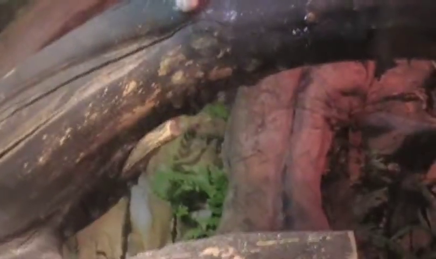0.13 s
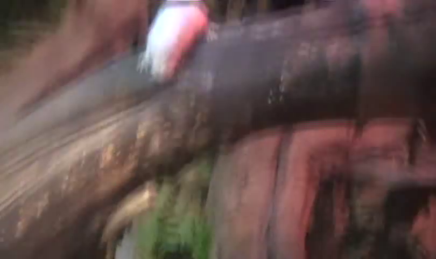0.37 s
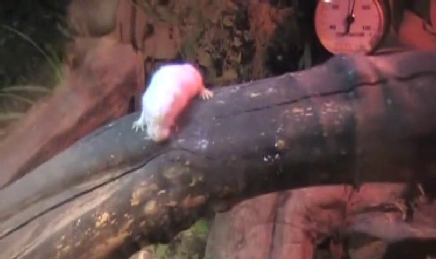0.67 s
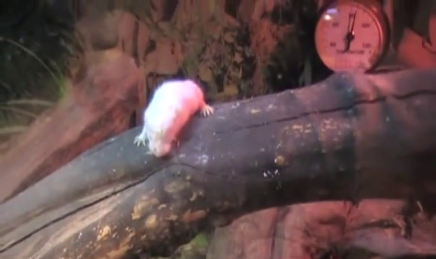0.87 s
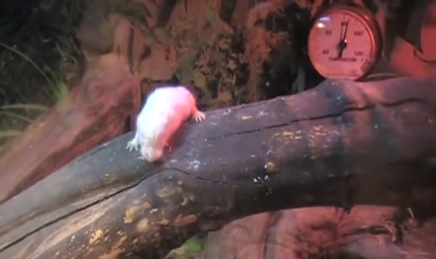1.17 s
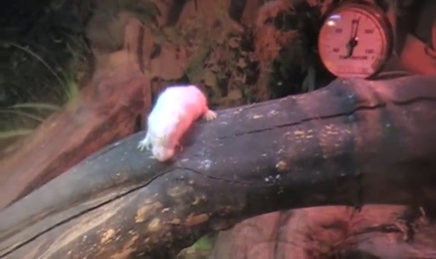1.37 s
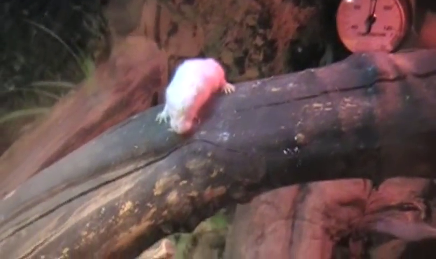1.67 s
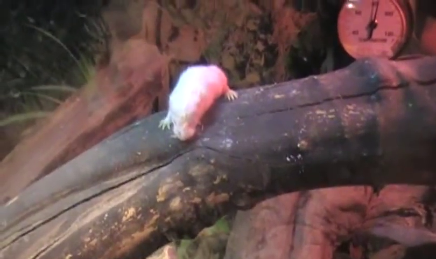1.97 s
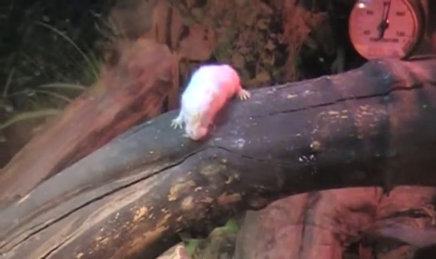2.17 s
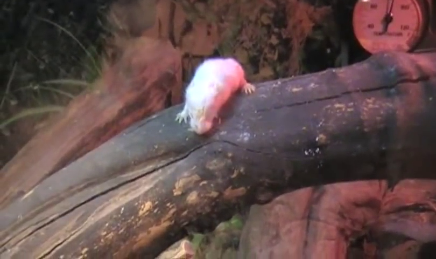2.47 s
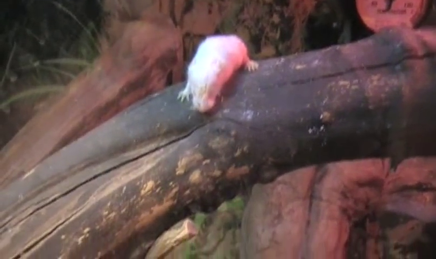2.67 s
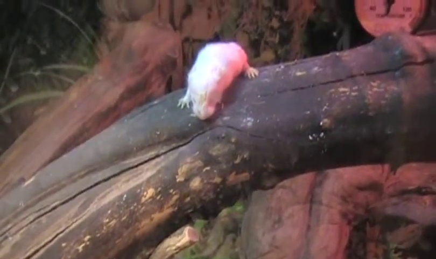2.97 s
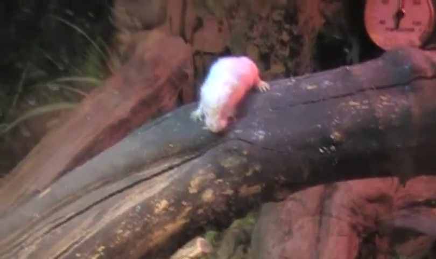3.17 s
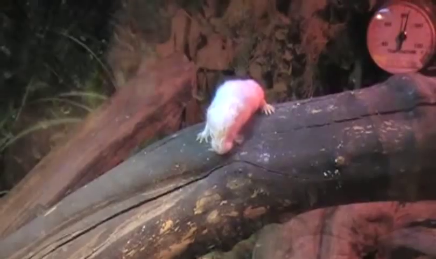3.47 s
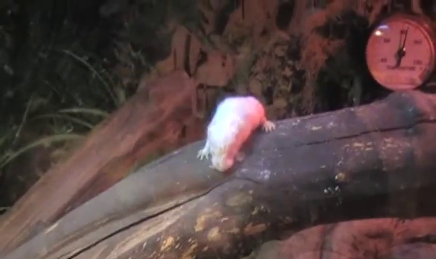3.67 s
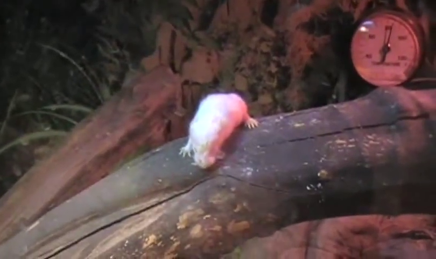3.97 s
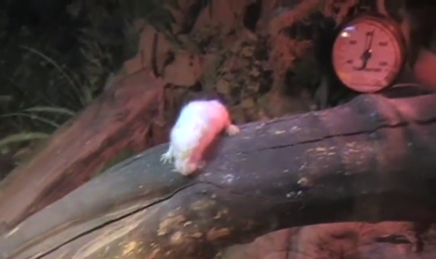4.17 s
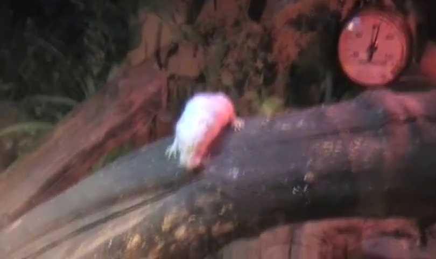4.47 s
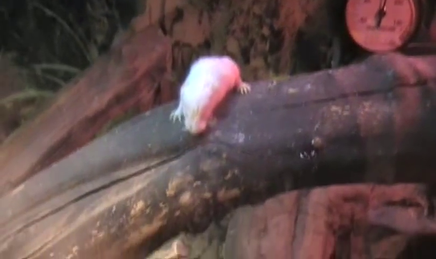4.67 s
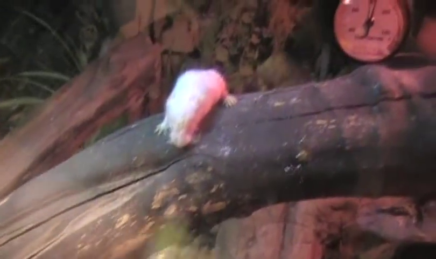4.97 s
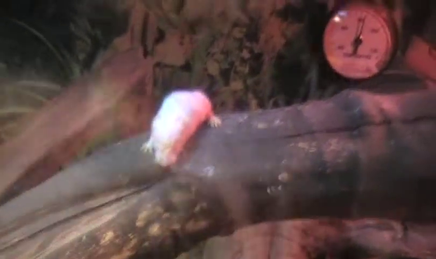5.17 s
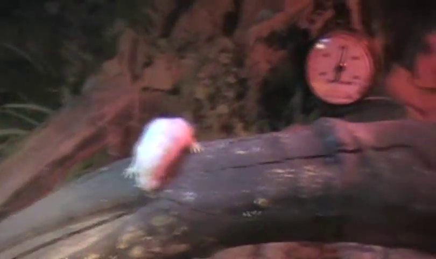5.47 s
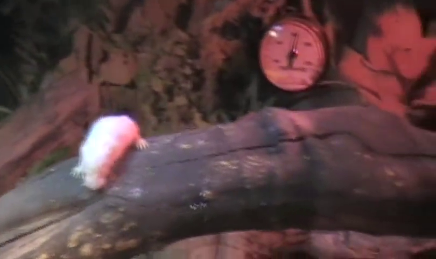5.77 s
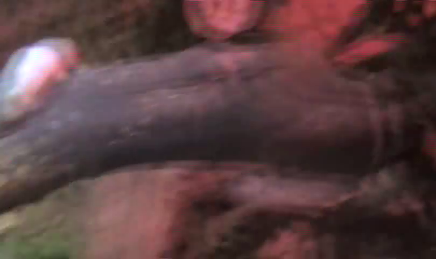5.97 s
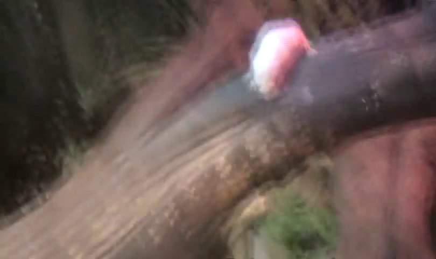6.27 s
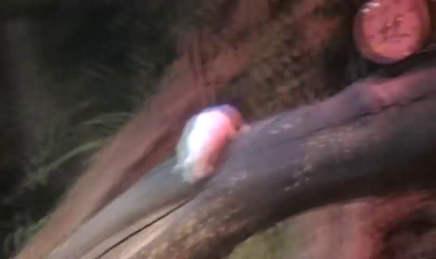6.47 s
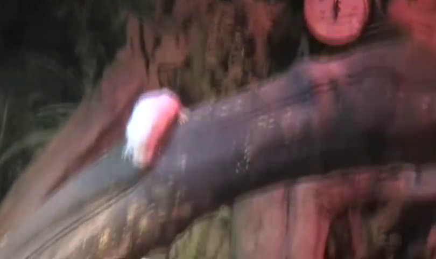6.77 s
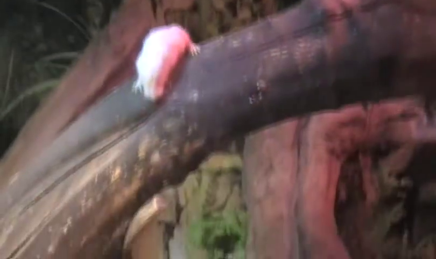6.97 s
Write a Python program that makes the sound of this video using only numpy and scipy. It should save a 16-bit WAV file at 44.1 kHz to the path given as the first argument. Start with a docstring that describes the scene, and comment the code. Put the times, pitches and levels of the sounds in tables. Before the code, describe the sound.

Quiet room noise and a low electrical hum run throughout. A baby rodent in a glass terrarium gives one tiny, high squeak at the very start, then quick groups of two or three at about 1.5, 2.4, 3.6, 4.4, 5.4 and 6.7 seconds. Each group grows louder, and the squeaks are thin, slightly breathy and ring briefly in the tank. Close to the microphone, light ticks appear from about 1.2 seconds, with a soft bump and scrape at 3.1 and more ticking afterwards. A hollow thump at 4.7 leads into a fast clatter of hard knocks around 5 seconds, by far the loudest sound. A sharp click follows at 5.4, then smaller taps and scrapes until about 6.2. Soft hand rustle is heard at the opening and again from 4 seconds to the end, just after 7.

```python
"""In a glass terrarium, a baby rodent on a log gives short rising groups of squeaks.
Each is a gliding whistle with a puff of air, prolonged by the tank's resonances and echoes.
Close to the microphone something hard is knocked, ticked and scraped: impact excites its modes,
friction gives noise. Below lie room noise, mains hum, a faint whistle and the rustle of a hand."""
import sys
import numpy as np
from scipy import signal
from scipy.io import wavfile

SR = 44100
rng = np.random.default_rng(int(sys.argv[2]) if len(sys.argv) > 2 else 0)


def inscribe(sig):
    """Save sig as 16-bit PCM at rate SR to the path in sys.argv[1].

    A 1-D sig is mono; a 2-D sig holds one channel per row.
    Samples are clipped to [-1, 1] before scaling.
    """
    pcm = np.round(np.clip(np.atleast_2d(sig).T, -1, 1) * 32767)
    wavfile.write(sys.argv[1], SR, pcm.astype(np.int16))


N = 313985


def from_db(db):
    """Decibels to amplitude ratio."""
    return 10 ** (np.asarray(db) / 20)


def rms_one(x):
    """Normalisation to unit rms."""
    return x / np.sqrt(np.mean(x ** 2) + 1e-20)


def at_hz(points, hz):
    """Interpolation of a table on a log-frequency axis."""
    freqs, values = np.transpose(points)
    return np.interp(np.log(hz), np.log(freqs), values)


def band(x, low_hz, high_hz, order=2):
    """Butterworth band-pass filtering."""
    return signal.sosfilt(signal.butter(order, [low_hz, high_hz], "band", fs=SR, output="sos"), x)


def drift(rate_hz, count):
    """Random fluctuation: noise through two one-pole low-passes, at unit rms."""
    r = np.exp(-2 * np.pi * rate_hz / SR)
    return rms_one(signal.lfilter([1], [1, -2 * r, r * r], rng.standard_normal(count + SR))[SR:])


def add(out, sound, start_s, pan_db):
    """Superposition on the stereo track; pan_db is the level left minus right."""
    i = round(start_s * SR)
    out[:, i:i + sound.shape[-1]] += (sound * from_db([[pan_db / 2], [-pan_db / 2]]))[:, :N - i]


def wide_noise(count, width):
    """Mid-side noise: one part in phase at the two ears, one in antiphase."""
    mid, side = rng.standard_normal((2, count))
    return mid + width * side * [[1], [-1]]


def correlated(mid, side, correlation):
    """Partial coherence: two independent noises mix to a given left-right correlation."""
    return np.sqrt(1 + correlation) * mid + np.sqrt(1 - correlation) * side * [[1], [-1]]


# likeness of the noise at the two ears: frequency_hz, correlation
EAR_CORRELATION = [(60, -0.17), (130, 0.67), (290, -0.39), (640, -0.46), (1410, -0.54), (3100, -0.22),
                   (6820, 0.17), (15000, -0.37)]
def banded_noise(spectrum, flicker_db=0.5):
    """Spectral shaping: half-octave bands of stereo noise flicker separately; the sum has unit rms."""
    out, edges = 0, np.geomspace(20, 17000, 21)
    white, flicker = rng.standard_normal((2, 2, N)), drift(9, 2 * N)
    for k, (low, high) in enumerate(zip(edges, edges[1:])):
        mid, side = band(white[k % 2], low, high)
        centre_hz = np.sqrt(low * high)
        gain = from_db(at_hz(spectrum, centre_hz) + flicker_db * flicker[k * N // 20:][:N])
        out = out + gain * correlated(mid, side, at_hz(EAR_CORRELATION, centre_hz))
    return rms_one(out)


# spectrum of the room's air: frequency_hz, relative_density_db
AIR_SPECTRUM = [(25, -53), (40, -12.5), (60, -8.5), (90, -13.5), (160, -8.5), (250, -9.5), (500, -15.5),
                (650, -15), (1240, -22), (2130, -26.5), (5000, -36), (12500, -42.5), (14500, -40.5),
                (16000, -54)]
def room_noise(level_db=-45.5):
    """Ambient noise: the air of the room gives a steady broadband floor."""
    return from_db(level_db) * banded_noise(AIR_SPECTRUM) * from_db([[-.5], [.5]])


# mains and motor tones, and a high whine: pitch_hz, level_db, waver_db
HUM_TONES = [(119.6, -51, 1.5), (1065, -78, 7.5), (2162, -73.5, 0.5)]
HIGH_WHINE = [(12600, -78, 1.5)]
def hum():
    """Amplitude modulation: mains hum and thin motor tones waver in level at constant pitch."""
    t, tones = np.arange(N) / SR, 0
    for hz, db, waver_db in HUM_TONES + HIGH_WHINE:
        amplitude = np.sqrt(2) * from_db(db + waver_db * drift(22, N))
        tones += amplitude * np.sin(2 * np.pi * (hz * t + rng.random()))
    return tones * from_db([[-1.8], [1.8]])


# course of a faint whistle: time_s, pitch_hz, level_db
WHISTLE_PATH = [(.08, 9600, -95), (.13, 9650, -74), (.2, 9850, -77), (.27, 10050, -79), (.33, 9850, -75),
                (.39, 9950, -79), (.45, 10400, -84), (.52, 9650, -75), (.58, 9600, -95)]
def whistle(flicker_db=3):
    """Frequency and amplitude modulation: a thin tone wanders and flickers."""
    times, hz, db = np.transpose(WHISTLE_PATH)
    t = np.arange(N) / SR
    level = from_db(np.interp(t, times, db, left=-200, right=-200) + flicker_db * drift(30, N))
    return np.sqrt(2) * level * np.sin(2 * np.pi * np.cumsum(np.interp(t, times, hz)) / SR)


# movement of the hand that holds the microphone: time_s, rub_db, hiss_db
HAND_MOTION = [(0, -52, -80), (.45, -51.5, -84), (.9, -65, -84), (2.9, -68, -84), (3.4, -65, -75),
               (3.9, -52.5, -73), (4.16, -49.5, -71), (4.36, -45.5, -59.5), (4.55, -53, -68),
               (5.3, -50.5, -68), (5.75, -52.5, -66), (6.2, -52, -70), (6.5, -45.5, -60.5),
               (6.65, -47.5, -63.5), (6.9, -49, -63.5), (7.12, -48, -61)]
# spectrum of the rubbing: frequency_hz, relative_density_db
RUB_SPECTRUM = [(150, -24), (280, -14.5), (500, 2), (800, -4), (1300, -7), (2150, -15), (3300, -17),
                (4300, -19), (6000, -20), (8300, -26.5), (11000, -29), (15000, -42)]
# bands of hiss: centre_hz, width_hz, gain_db
HISS_BANDS = [(2170, 360, 1), (4350, 400, -6), (6200, 480, -7), (8400, 500, 0), (9500, 3300, -1)]
def rustle():
    """Friction noise: skin and cloth rub as the hand moves, and a few bands of hiss stand out."""
    times, rub_db, hiss_db = np.transpose(HAND_MOTION)
    t, noise = np.arange(N) / SR, wide_noise(N, width=0.5)
    hiss = sum(from_db(db) * rms_one(band(noise, hz - width / 2, hz + width / 2, order=1))
               for hz, width, db in HISS_BANDS)
    rub = banded_noise([(14, -60)] + RUB_SPECTRUM)
    return from_db(np.interp(t, times, rub_db)) * rub + from_db(np.interp(t, times, hiss_db)) * hiss


# reverberation time of the room: frequency_hz, t60_s
ROOM_DECAY = [(200, 0.29), (2000, 0.35), (5500, 0.24), (8500, 0.19), (13000, 0.038)]
def room(x, onset_s=0.002):
    """Reverberation: dense reflections act as a noise tail, each octave decaying at its own rate."""
    t, edges = np.arange(SR // 2) / SR, 80 * 2 ** np.arange(9)
    noise = correlated(*rng.standard_normal((2, len(t))), correlation=0.73)
    tail = sum(band(noise, low, high) * from_db(-60 * t / at_hz(ROOM_DECAY, np.sqrt(low * high)))
               for low, high in zip(edges, edges[1:]))
    tail *= np.clip(t / onset_s, 0, 1) ** 2
    response = rms_one(tail) / np.sqrt(len(t))
    return signal.fftconvolve(x.mean(axis=0, keepdims=True), response, axes=1)[:, :N]


# scraping strokes: start_s, length_s, level_db, tilt_db_per_octave
STROKES = [(3.132, 0.12, -45, 0), (3.889, .066, -62.5, 4), (4.852, .085, -47, 1.5),
           (4.914, 0.032, -41.5, -2.5), (5.204, 0.081, -56.5, 5.5), (5.663, 0.056, -52.5, -2),
           (6.137, 0.12, -55.5, 2)]
# response of the rubbed surface: low_hz, high_hz, gain_db
SURFACE_BANDS = [(187, 326, 4), (740, 1000, 2.5), (1890, 2550, -1), (2730, 4750, -3.5), (5500, 10400, -4.5)]
def scrapes(grain_db=2.0):
    """Sliding friction: uneven grains excite the surface; a lighter stroke tilts the spectrum upward."""
    out, count = np.zeros((2, N)), SR // 4
    for start, length, db, tilt in STROKES:
        grains = wide_noise(count, width=0.35) * from_db(grain_db * drift(170, count))
        rub = sum(from_db(gain_db + tilt * np.log2(low / 1000)) * rms_one(band(grains, low, high))
                  for low, high, gain_db in SURFACE_BANDS)
        progress = np.arange(round(length * SR)) / (length * SR)
        swell = np.sin(np.pi * progress ** 0.69)
        add(out, from_db(db) * rub[:, :len(swell)] * swell, start, pan_db=-1.5)
    return out


# light contacts: start_s, level_db, low_hz, high_hz, pan_db
LIGHT_CONTACTS = [(1.165, -41.5, 2300, 3300, 3), (1.399, -38, 1500, 8400, 0), (2.209, -36, 1600, 5940, 6),
                  (2.301, -41, 2000, 3800, 7), (3.271, -45, 1500, 6500, 3), (3.351, -39, 2500, 10000, -1),
                  (3.365, -39.5, 1790, 3600, 1), (3.377, -41.5, 1800, 3600, 3),
                  (3.409, -42, 2500, 13000, 0), (3.465, -41.5, 2220, 3970, 6), (3.899, -41, 5000, 12100, 1),
                  (4.039, -43, 6000, 15000, 10), (4.258, -46, 6960, 9500, 0), (4.432, -37, 6980, 12750, 9),
                  (4.511, -36, 1980, 9500, 0), (4.534, -42, 7460, 10970, -4),
                  (4.690, -43.5, 6000, 10900, 0), (4.741, -42.5, 2000, 9000, -2),
                  (4.786, -49, 4000, 9770, -20), (4.806, -35, 3500, 10900, -2),
                  (5.413, -18.5, 700, 5000, 0), (5.268, -24, 900, 9500, 8), (5.881, -42, 3000, 11000, 0),
                  (5.969, -27, 1950, 13700, 5), (5.990, -28, 7040, 13900, 7), (6.197, -40, 1480, 3000, -2)]
def ticks(t60_s=0.015):
    """Impact transients: an impulse and a fast-decaying noise, limited to the band of the contact."""
    out, t = np.zeros((2, N)), np.arange(SR // 10) / SR
    for start, db, low, high, pan_db in LIGHT_CONTACTS:
        excitation = rng.standard_normal(len(t)) + 0.8 * (t == 0)
        tick = band(excitation * from_db(-60 * t / t60_s), low, high)
        add(out, from_db(db) * tick / np.abs(tick).max(), start, pan_db)
    return out


def blows(events, modes, noise_db, loss_db, damping, pan_db, attack_s, width, noise_t60_s=0.069):
    """Modal ringing: ever weaker touches each excite all modes and a noise; the hand damps both."""
    out, t = np.zeros((2, N)), np.arange(SR // 4) / SR
    hz, mode_db, t60 = np.transpose(modes)[:, :, None]
    damped_t = t / (1 - damping)
    for start, db, low, high, touches, gap in events:
        for k in range(touches):
            strength = from_db(mode_db + 2.8 * rng.standard_normal(hz.shape))
            strength *= rng.choice([-1, 1], hz.shape)
            rings = np.sum(strength * from_db(-60 * damped_t / t60) * np.sin(2 * np.pi * hz * t), axis=0)
            noise = from_db(noise_db - 60 * damped_t / noise_t60_s) * wide_noise(len(t), width)
            blow = band((rings + noise) * np.clip(t / attack_s, 0, 1), low, high)
            add(out, from_db(db - loss_db * k) * blow / np.abs(blow).max(), start + gap * k, pan_db)
    return out


# dull blows: start_s, level_db, low_hz, high_hz, touch_count, gap_s
DULL_BLOWS = [(3.104, -24.5, 503, 2480, 1, .004), (3.108, -28.5, 148, 400, 1, .01),
              (3.128, -40, 150, 300, 1, .01), (4.742, -10, 198, 1600, 5, .008),
              (5.416, -24, 110, 560, 4, .0145), (5.49, -37.5, 100, 300, 3, .02),
              (5.309, -36.5, 655, 1040, 1, .01), (5.660, -25, 1010, 1730, 1, .01)]
# modes of the hollow housing: frequency_hz, gain_db, t60_s
HOUSING_MODES = [(196, 2, 0.07), (213, 2, 0.19), (295, 3.5, 0.11), (356, 8, 0.032), (437, 5.5, 0.04),
                 (715, -9, 0.17), (806, 1, 0.05), (1100, -2, 0.049), (1360, -11, 0.12), (1423, -6.5, 0.14),
                 (1755, -10, 0.046)]
def thumps():
    """Soft impact: a slower, low-band contact excites the modes of the hollow housing."""
    return blows(DULL_BLOWS, HOUSING_MODES, noise_db=-2, loss_db=1, damping=0.5,
                 pan_db=-3.5, attack_s=0.0013, width=0.33)


# hard blows: start_s, level_db, low_hz, high_hz, touch_count, gap_s
HARD_BLOWS = [(4.944, 4, 300, 4730, 3, .0065), (4.970, -2, 150, 5500, 2, .0055),
              (4.985, -2, 149, 5500, 3, .006), (5.021, -17, 146, 3970, 1, 0.013),
              (5.310, -20, 5950, 11600, 1, .01), (5.413, -8, 5500, 11700, 2, .003),
              (5.436, -23, 2980, 12000, 1, .01), (5.661, -27.5, 1100, 7400, 1, .01)]
# modes of the knocked object: frequency_hz, gain_db, t60_s
OBJECT_MODES = [(228.7, 9.5, 0.29), (300, -10, 0.15), (347, 6.5, 0.26), (400, 10, 0.07), (536, 0, 0.37),
                (816, 2.5, 0.091), (993, 2.5, 0.25), (1064, 15.5, 0.086), (1080, 8.5, 0.086),
                (1196, 12.5, 0.048), (1410, 0, 0.079), (1680, 15, 0.036), (1788, 12, 0.065), (1936, 3, 0.1),
                (2036, 15.5, 0.055), (2847, 9, 0.083), (3104, 16.5, 0.028), (3530, 10.5, 0.042),
                (4570, -21, 0.043), (5500, 10, 0.035), (8500, -6, 0.14), (8900, -3, 0.064),
                (10400, 4, 0.082), (11900, -8, 0.061)]
def knocks():
    """Hard impact: an abrupt contact gives a broadband crack and sets the object ringing."""
    return blows(HARD_BLOWS, OBJECT_MODES, noise_db=23, loss_db=5.5, damping=0.47,
                 pan_db=-3, attack_s=0.00034, width=0.34)


# air resonances of the glass tank: frequency_hz, gain_db, t60_s
TANK_MODES = [(5300, -52, 0.31), (5390, -54.5, 0.27), (5440, -58, 0.31)]
# reflections off glass and walls: delay_s, gain_db
REFLECTIONS = [(0.012, -16.5), (.020, -32), (0.028, -15.5), (.036, -19), (.047, -26), (0.058, -25),
               (.068, -25.5), (.092, -29), (.11, -35), (.14, -36.5)]
def tank(x):
    """Cavity resonance: closely spaced air modes ring on and beat after a call; echoes follow."""
    rung = x.copy()
    for hz, db, t60 in TANK_MODES:
        r, w = from_db(-60 / (t60 * SR)), 2 * np.pi * hz / SR  # pole radius and angle
        rung += from_db(db) * signal.lfilter([0, np.sin(w)], [1, -2 * r * np.cos(w), r * r], x + 1e-18)
    out = rung.copy()
    for delay, db in REFLECTIONS:
        lag = round(delay * SR)
        out[:, lag:] += from_db(db) * rung[:, :-lag]
    return out


# the rodent's calls: start_s, level_db, start_hz, end_hz, length_s, roughness
CALLS = [(0.0, -29, 5500, 5520, 0.014, 0.38), (1.480, -44.5, 4700, 4210, 0.019, 0.48),
         (1.530, -29.5, 6200, 5300, 0.015, 0.19), (1.592, -23.5, 6040, 5860, 0.015, 0.04),
         (2.392, -52, 4570, 4260, 0.017, 0.9), (2.436, -38.5, 5600, 5546, 0.018, 0.71),
         (2.507, -33, 5500, 5470, 0.017, 0.44), (3.565, -53.5, 4190, 4730, 0.024, 0.7),
         (3.597, -35.5, 5700, 5300, 0.015, 0.9), (3.657, -31, 5500, 5550, 0.019, 0.42),
         (4.384, -44, 5100, 4550, 0.039, 0.67), (4.448, -28, 5630, 5460, 0.014, 0.25),
         (5.355, -40.5, 5500, 5420, 0.018, 0.56), (5.428, -33.5, 5330, 5330, 0.013, 0.1),
         (5.473, -27, 5920, 5330, 0.012, 0.25), (6.683, -36.5, 5050, 4860, 0.034, 0.34),
         (6.734, -26.5, 5740, 6000, 0.02, 0.23), (6.799, -24.5, 5790, 6120, 0.018, 0.07)]
# air escaping with each call: low_hz, high_hz, gain_db, lag_s, t60_s
BREATH_BANDS = [(5500, 7040, -4, 0.011, 0.048), (9000, 10000, -18.5, 0.0049, 0.05),
                (10900, 11900, -16.5, 0.0074, 0.093)]
def squeaks(bend=0.57, wobble_hz=220, octave_db=-24, side_offset_hz=520, pan_db=-3):
    """Modulated whistle: it glides and settles, made rough by jitter and beating; raspy air follows."""
    out, t = np.zeros((2, N)), np.arange(4096) / SR
    for start, db, start_hz, end_hz, length, rough in CALLS:
        jitter, shimmer, hiss = drift(400, len(t)), drift(590, len(t)), rng.standard_normal(len(t))
        progress = np.clip(t / length, 0, 1)
        glide_hz = start_hz + (end_hz - start_hz) * np.tanh(progress / bend) / np.tanh(1 / bend)
        phase = 2 * np.pi * np.cumsum(glide_hz + wobble_hz * (0.055 + rough) * jitter) / SR
        tone = np.sin(phase) + from_db(octave_db) * progress * np.sin(2 * phase)
        tone += 0.72 * rough * np.sin(phase + 2 * np.pi * side_offset_hz * t)  # beating side tone
        swell = np.abs(np.sin(np.pi * progress ** 0.73)) ** 1.34
        add(out, from_db(db + 4.9 * rough * shimmer) * swell * tone, start, pan_db)
        for low, high, air_db, lag, t60 in BREATH_BANDS:
            puff = np.clip(t / 0.0026, 0, 1) * from_db(-60 * t / t60) * rms_one(band(hiss, low, high))
            add(out, from_db(db + air_db) * (0.15 + rough) * puff, start + lag, pan_db)
    return out


def scene():
    """Direct-to-reverberant ratio: the animal, farther off than the handled object, is more reverberant."""
    animal = squeaks()
    handling = knocks() + thumps() + ticks() + scrapes()
    reverberation = room(from_db(-5) * animal + from_db(-11) * handling)
    return tank(animal) + handling + reverberation + room_noise() + rustle() + hum() + whistle()


def record(dry, roll_off_hz=11700, cutoff_hz=15780):
    """Band limiting and clipping: the microphone dulls the treble, overload clips, the top is cut."""
    dulled = signal.sosfilt(signal.butter(2, roll_off_hz, fs=SR, output="sos"), dry)
    steep_low_pass = signal.cheby2(12, 60, cutoff_hz, fs=SR, output="sos")
    return np.clip(signal.sosfilt(steep_low_pass, np.clip(dulled, -1, 1)), -1, 1)


dry = scene()
out = record(dry)
inscribe(out)
```